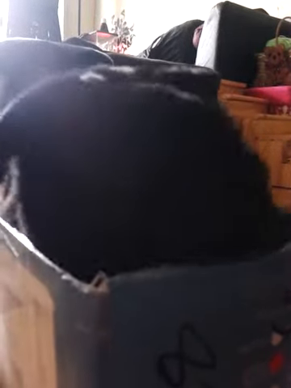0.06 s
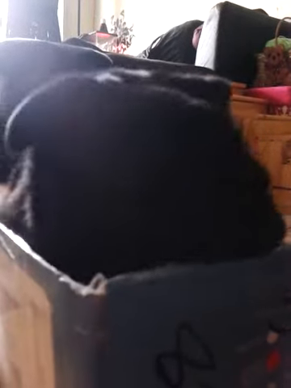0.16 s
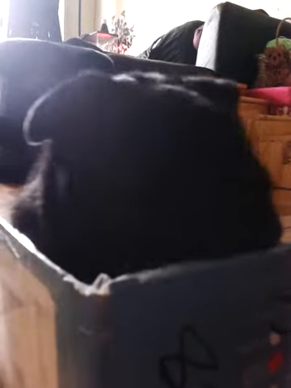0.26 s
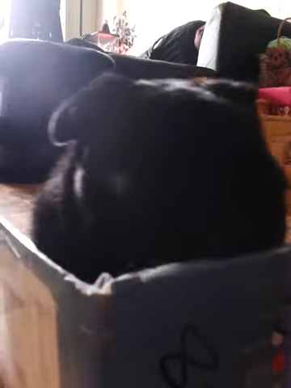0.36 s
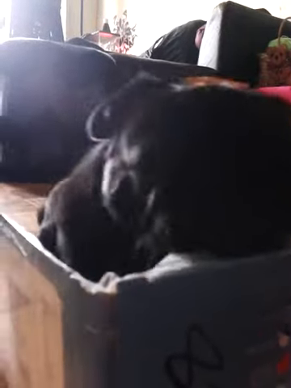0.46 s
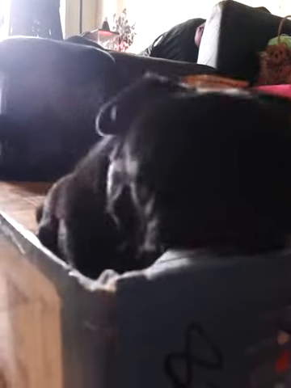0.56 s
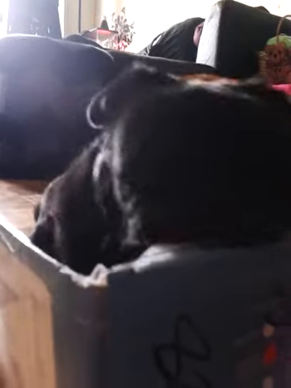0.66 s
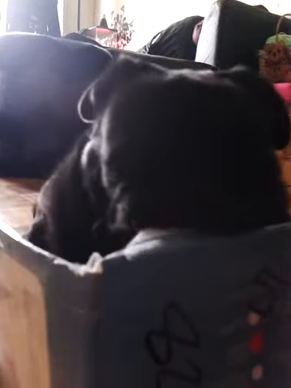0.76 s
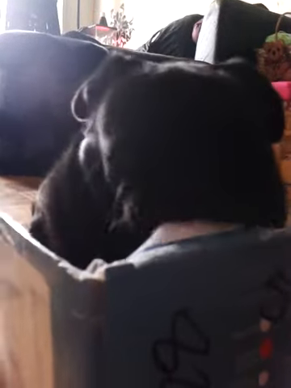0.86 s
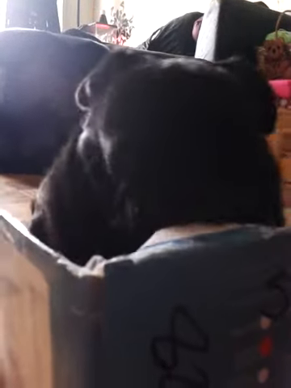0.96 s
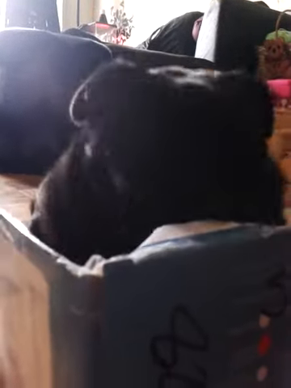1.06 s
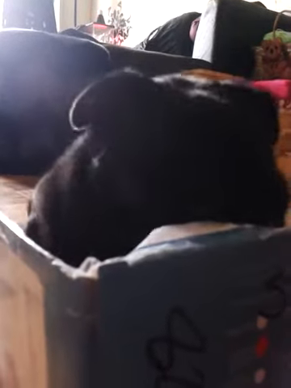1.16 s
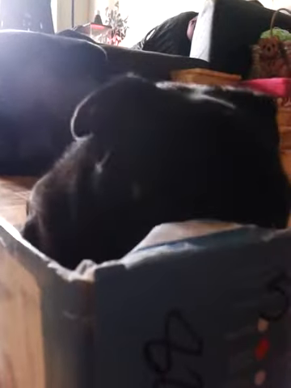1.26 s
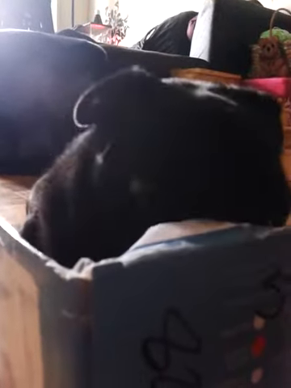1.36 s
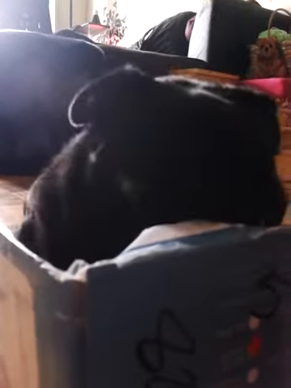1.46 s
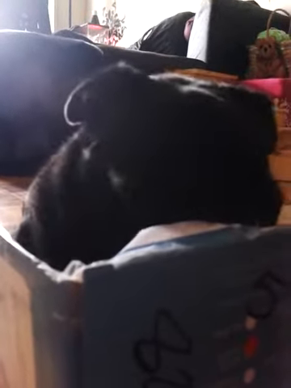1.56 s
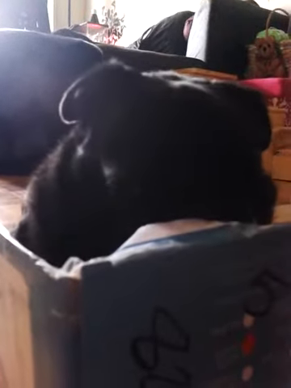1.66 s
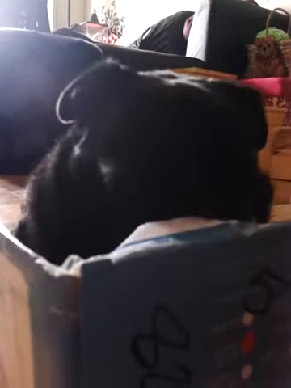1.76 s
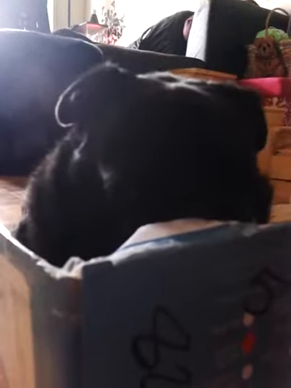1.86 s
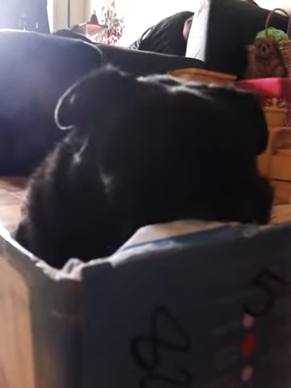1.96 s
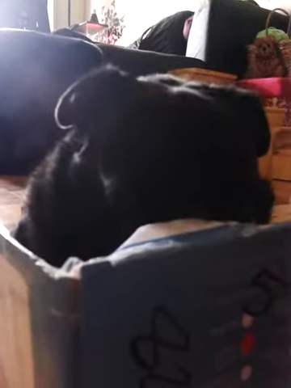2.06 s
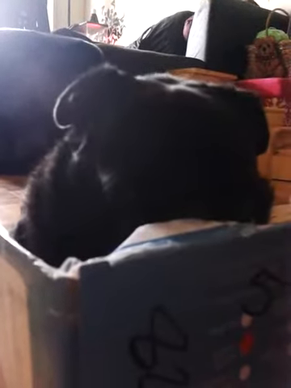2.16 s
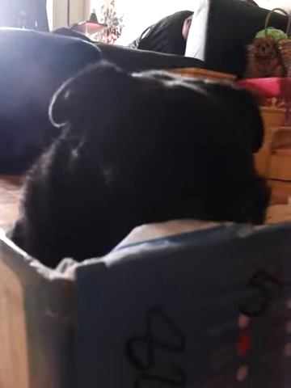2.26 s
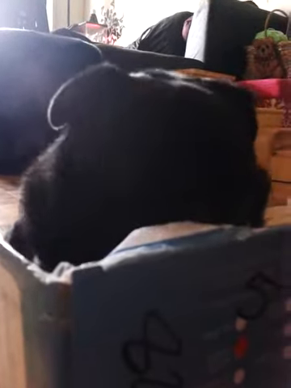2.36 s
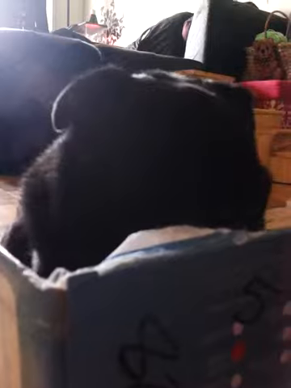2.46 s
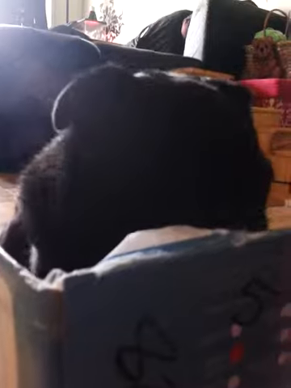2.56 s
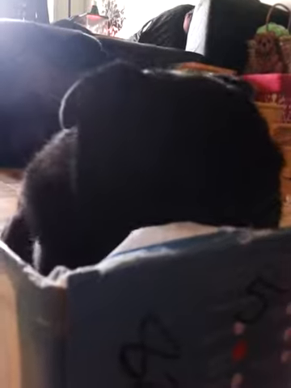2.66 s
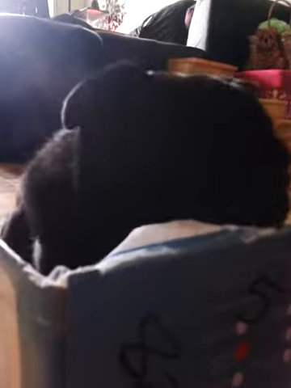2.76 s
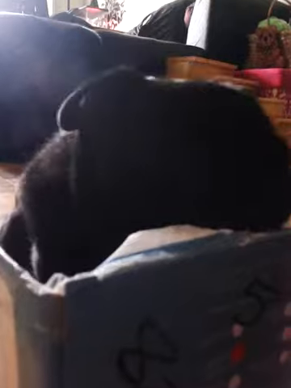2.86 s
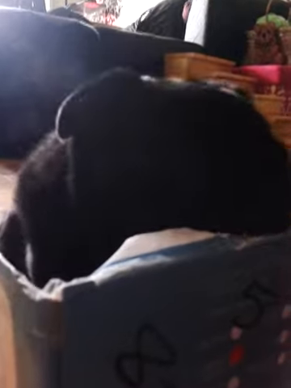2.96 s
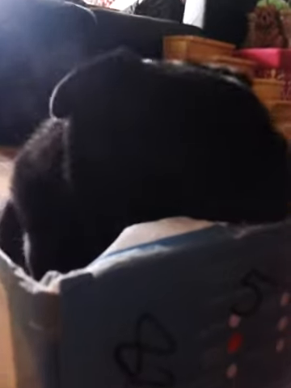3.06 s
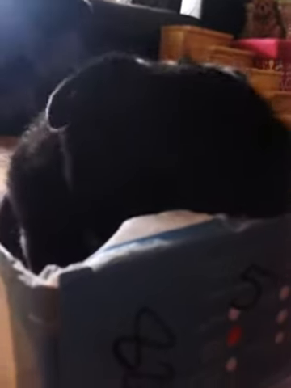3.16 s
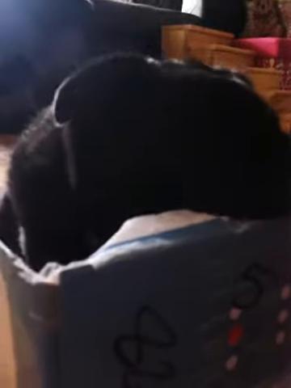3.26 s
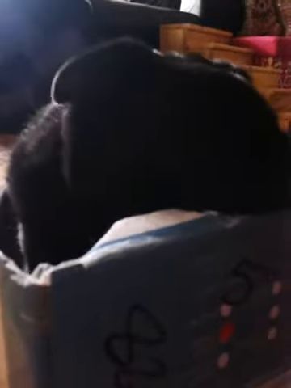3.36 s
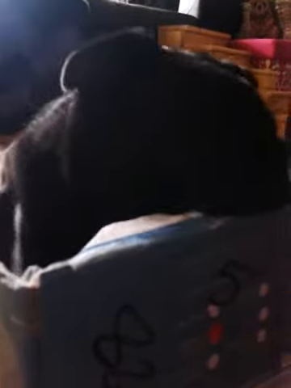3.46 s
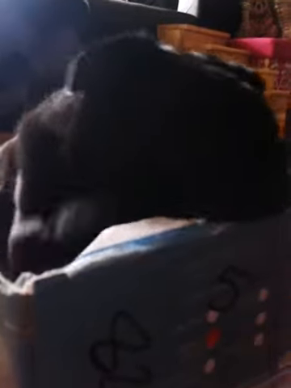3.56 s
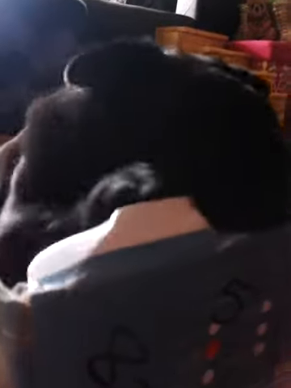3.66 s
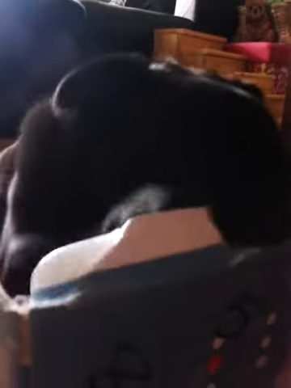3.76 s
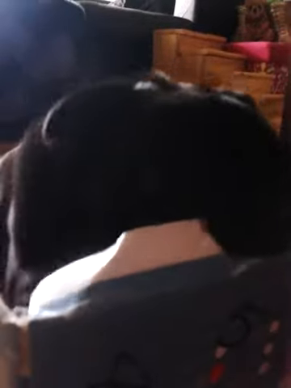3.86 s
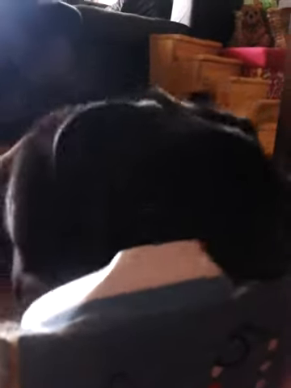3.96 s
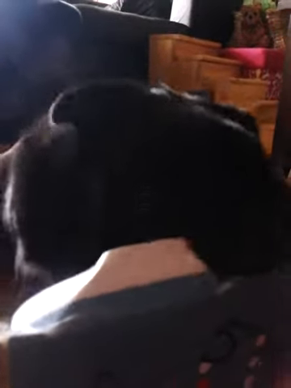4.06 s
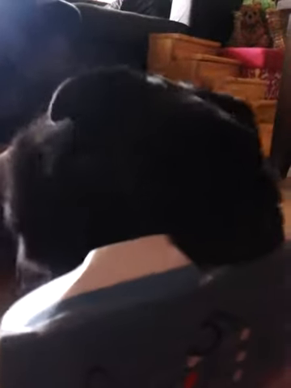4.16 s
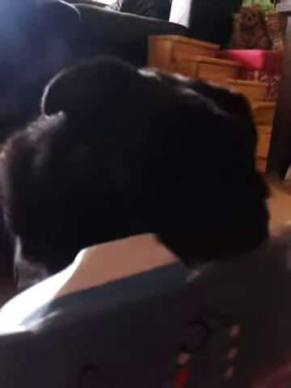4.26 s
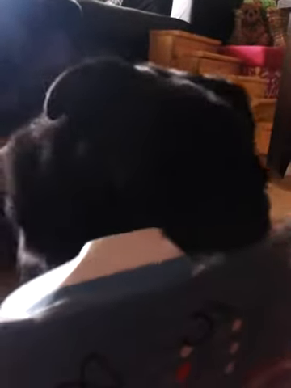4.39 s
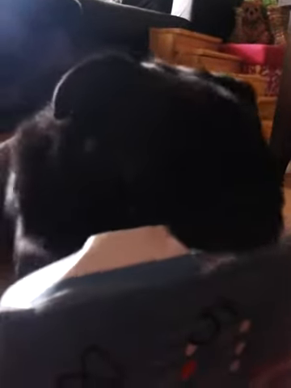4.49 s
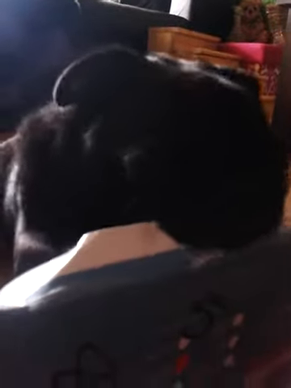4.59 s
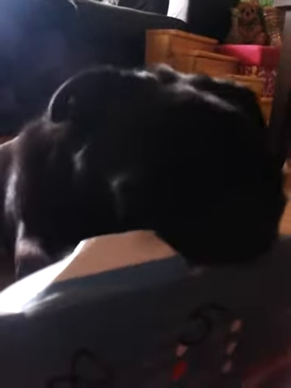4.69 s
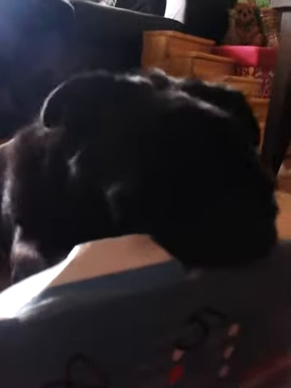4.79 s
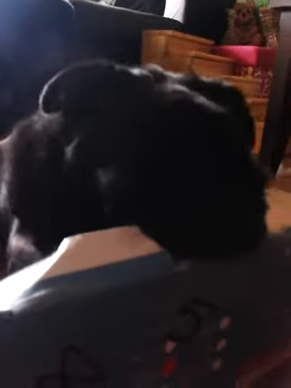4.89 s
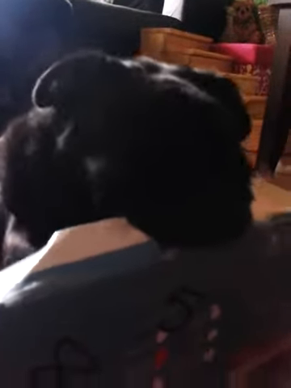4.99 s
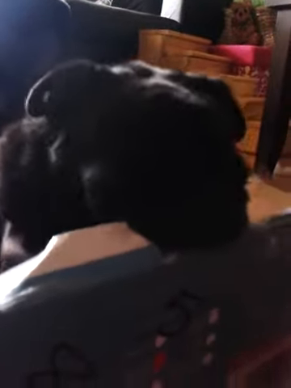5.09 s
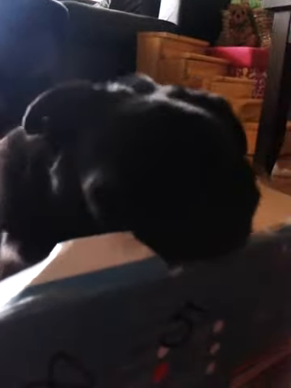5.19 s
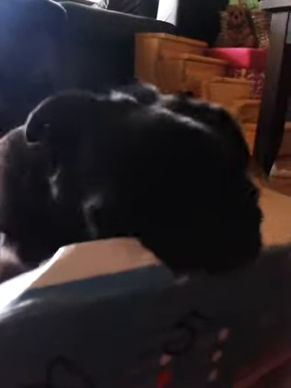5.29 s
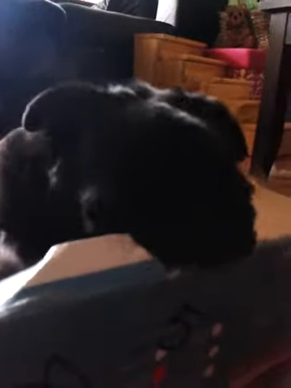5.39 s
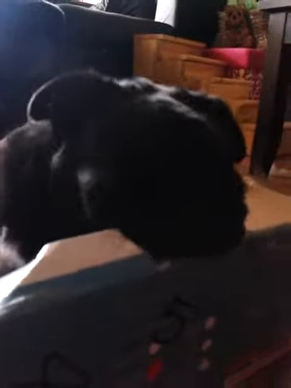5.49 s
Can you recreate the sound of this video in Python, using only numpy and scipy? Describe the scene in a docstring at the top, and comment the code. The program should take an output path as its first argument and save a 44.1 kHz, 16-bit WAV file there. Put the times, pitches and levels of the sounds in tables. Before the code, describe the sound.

Sharp cardboard cracks and crinkles burst out at once, followed by quick nose puffs, faint rubbing and dull box bumps in a quiet room.

```python
"""Over a quiet room hum and hiss, cardboard crinkles, snaps, rips and knocks as a dog works at a box.
The dog then sniffs in quick puffs, rubs its muzzle on the flap and nudges the box about on the floor.
Knocks are sums of fading tones; snaps and ticks are short noise bursts; rips, sniffs and rubbing are
shaped noise. The room answers the hits softly, and the loudest snaps overload the microphone input."""
import sys
import numpy as np
from scipy import signal
from scipy.fft import rfft, irfft, next_fast_len
from scipy.io import wavfile
from scipy.ndimage import map_coordinates

SR = 44100
rng = np.random.default_rng(int(sys.argv[2]) if len(sys.argv) > 2 else 0)


def output_pcm(signal):
    """Save a mono or channel-first signal as 16-bit PCM at the path in sys.argv[1].

    Samples are clipped to [-1, 1] before scaling.
    """
    pcm = np.clip(np.atleast_2d(signal).T, -1, 1) * 32767
    wavfile.write(sys.argv[1], SR, np.round(pcm).astype(np.int16))


N = 243869  # length of the scene in samples


def amp(db):
    """Turn decibels into a plain gain."""
    return 10 ** (np.asarray(db) / 20)


def unit(x):
    """Scale a sound to an average strength (rms) of 1."""
    return x / np.sqrt(np.mean(x ** 2) + 1e-20)


def along(points, hz):
    """Read a curve of (f/Hz, value) points, joined by lines on a log frequency axis."""
    f, v = np.transpose(points)
    return np.interp(np.log(hz + 1), np.log(f + 1), v)


def level(rows):
    """Gain per sample from (t/s, level/dB) rows, practically silent outside them."""
    s, db = np.transpose(rows)
    return amp(np.interp(np.arange(N) / SR, s, db, left=-150, right=-150))


def swells(rows, sharp, lean=1):
    """Gain that rises and falls once per (start t/s, end t/s, level/dB) row; lean under 1 peaks early."""
    t = np.arange(N) / SR
    gain = np.zeros(N)
    for start, end, db in rows:
        progress = np.clip((t - start) / (end - start), 0, 1)
        hump = np.abs(np.sin(np.pi * progress ** lean)) ** sharp
        gain += amp(db) * hump * (t > start) * (t < end)
    return gain


def filtered(x, response):
    """Multiply each frequency of x by response(frequency)."""
    m = next_fast_len(len(x) + 8192)  # spare room so that the end does not wrap round
    return irfft(rfft(x, m) * response(np.fft.rfftfreq(m, 1 / SR)), m)[:len(x)]


def resonant(modes):
    """Response of things that ring after a push: (f/Hz, width/Hz, level/dB) rows, alternating in sign."""
    def response(f):
        total = 0
        for k, (centre, width, db) in enumerate(modes):
            peak = 1j * f * width / (centre * centre - f * f + 1j * f * width)
            total = total + (-1) ** k * amp(db) * peak
        return total
    return response


def grainy(per_s, spread_db):
    """Noise whose strength wanders between per_s random levels a second, rms 1."""
    knots = rng.standard_normal(int(N * per_s / SR) + 4)
    wander = map_coordinates(knots, [np.arange(N) * per_s / SR], order=1)
    return unit(amp(spread_db * wander) * rng.standard_normal(N))


def grainy_like(curve, per_s, spread_db):
    """Grainy noise coloured by a (f/Hz, level/dB per Hz) curve, rms 1."""
    return unit(filtered(grainy(per_s, spread_db), lambda f: amp(along(curve, f))))


# colour of the room air and microphone hiss before scaling: (f/Hz, level/dB per Hz)
AIR_COLOUR = [(15, -56), (25, -25), (175, -7.5), (236, -5.5), (301, -11.5), (624, -20.5), (2000, -39.5),
              (2610, -37.5), (3250, -37), (4370, -38), (6560, -33.5), (14800, -27), (16000, -31)]
AIR_DB = -61.5  # rms
# faint steady drones: (f/Hz, width/Hz, level/dB)
DRONES = [(120.3, 5.4, -68.5), (299, 22, -65.5), (8273, 55, -87)]


def background():
    """Room air and microphone hiss as coloured noise, drones as noise in very narrow bands."""
    air = filtered(rng.standard_normal(N), lambda f: amp(along(AIR_COLOUR, f)))
    out = amp(AIR_DB) * unit(air)
    for hz, width, db in DRONES:
        drone = filtered(rng.standard_normal(N), resonant([(hz, width, 0)]))
        out += amp(db) * unit(drone)
    return out


# strength of the crinkling: (t/s, level/dB)
CRINKLE_LEVEL = [(0, -45.5), (.03, -40), (.2, -47), (.262, -55.5), (.29, -39.5), (.41, -37.5), (.53, -48.5),
                 (.7, -45), (.83, -57), (.9, -47.5), (1.3, -62.5)]
# colour of crinkling card: (f/Hz, level/dB per Hz)
CRINKLE_COLOUR = [(530, -36), (900, -3), (1290, -4), (1460, -3.5), (1600, -7.5), (2540, -3), (3640, -3),
                  (4200, -1.5), (6110, -16.5), (8450, -18), (16000, -39.5)]


def crinkling_flap():
    """The flap crinkles: many tiny card movements blend into uneven noise."""
    return level(CRINKLE_LEVEL) * grainy_like(CRINKLE_COLOUR, per_s=250, spread_db=3.0)


# ways the box walls like to vibrate, before the grip shifts them; also rung by bites: (f/Hz, level/dB)
WALL_MODES = [(130, -43), (230, -4.5), (300, -4.5), (410, 0), (520, 3.5), (610, 0), (780, 0), (930, -0.5),
              (1270, -1), (1560, -0.5), (1850, -2)]
# the box walls flexing: (t/s, level/dB)
FLEXING = [(0.0, -46), (0.49, -48), (0.65, -51), (1.34, -57), (2.71, -57.5), (3.03, -53.5), (3.2, -60),
           (3.62, -60), (3.85, -52.5), (4.17, -61), (4.57, -58.5), (4.93, -68.5), (5.53, -67)]
# strokes of muzzle and paw along the card, rasping too:
# (start t/s, end t/s, rasp level/dB, wall rumble level/dB)
CARD_STROKES = [(0.685, 0.734, -41.5, -48), (0.833, 0.87, -45, -46.5), (0.866, 0.951, -44.5, -41.5),
                (1.035, 1.107, -47, -48), (1.282, 1.376, -58, -52), (1.865, 1.918, -55.5, -69),
                (2.378, 2.45, -56, -77), (2.57, 2.71, -51, -62), (2.775, 2.918, -51.5, -52.5),
                (2.967, 3.113, -55.5, -78), (3.49, 3.603, -65, -62.5), (3.744, 3.839, -59, -43),
                (3.828, 3.908, -65, -50), (3.941, 4.001, -61, -50), (4.052, 4.137, -70, -48),
                (4.227, 4.288, -75.5, -58), (4.458, 4.545, -62, -45.5), (4.508, 4.629, -66.5, -49.5),
                (4.685, 4.778, -78, -68), (5.114, 5.348, -76, -57.5)]


def shaking_walls():
    """Flexing and strokes shake the walls: noise rumbles through their vibration modes."""
    walls = resonant([(hz, 0.15 * hz, db) for hz, db in WALL_MODES])
    rumble = grainy(per_s=150, spread_db=3)
    rumble = unit(filtered(rumble, lambda f: walls(f) / (1 + (f / 800) ** 2.4)))  # dull above 800 Hz
    strokes = [(start, end, rumble_db) for start, end, _, rumble_db in CARD_STROKES]
    return (level(FLEXING) + swells(strokes, sharp=1.7, lean=1.0)) * rumble


# bites and nudges: (t/s, knock of the box level/dB, snap of the card level/dB, tick level/dB,
#                    struck wall f/Hz, snap f/Hz)
HITS = [(0.029, -32, -23.5, -53, 491, 1630), (0.0706, -52, -6.5, -29, 990, 1980),
        (0.0893, -19.5, -17, -38, 880, 2160), (0.1006, -11, 2, -21, 542, 2780),
        (0.1101, -11.5, 2, -35, 884, 3660), (0.275, 3.5, 4.5, -6.5, 857.7, 3120),
        (0.279, -5, 0, -21.5, 590, 1392), (0.3613, -21, -2.5, -28, 853, 2880),
        (0.4035, -16.5, -25, -41, 490, 2150), (0.4518, -35, -27, -45, 548, 2010),
        (0.4705, -41, -38, -31, 610, 2720), (0.4897, -49, -26.5, -41, 530, 4350),
        (0.4983, -35, -49, -30.5, 470, 2190), (0.525, -33, -36, -39, 527, 4080),
        (0.5431, -19.5, -13, -28, 590, 1180), (0.594, -32, -32.5, -43, 1050, 1790),
        (0.6316, -43, -26.5, -44, 1020, 3360), (0.6718, -35, -35, -44, 540, 3620),
        (0.76, -50, -40, -44, 1000, 3090), (0.849, -36, -31.5, -57, 548, 2820),
        (0.8929, -25, -35, -41, 974, 1380), (0.9061, -25, -40, -50, 535, 1300),
        (0.923, -31, -49, -52.5, 527, 1300), (1.5014, -47, -40, -63.5, 410, 4260),
        (1.847, -46, -47.5, -57, 585, 2540), (1.8941, -40.5, -50, -58, 505, 4180),
        (2.0393, -43.5, -39.5, -61.5, 587, 4290), (2.374, -63, -43, -56, 490, 2580),
        (2.3961, -38.5, -25.5, -47, 1060, 2380), (2.454, -48, -40, -46.5, 960, 2420),
        (2.9974, -30.5, -54, -44, 852, 1200), (3.0129, -32.5, -45, -46, 272, 1940),
        (3.0332, -37, -53, -55, 270, 2480), (3.062, -37, -55, -55, 460, 1745),
        (3.0766, -35.5, -49, -53, 318, 1307), (3.1155, -35.5, -60, -49, 295, 1200),
        (3.1487, -36, -58, -52, 290, 1176), (3.1672, -40, -51.5, -54.5, 412, 1220),
        (3.184, -38, -42, -45.5, 393, 4860), (3.204, -39.5, -49.5, -58, 600, 1200),
        (3.29, -42.5, -51.5, -60.5, 863, 1192), (3.3372, -37, -49.5, -53.5, 852, 1200),
        (3.5237, -23.5, -27.5, -46.5, 432, 1380), (3.6663, -36.5, -47, -45, 466, 1415),
        (3.7503, -11.5, -17.5, -18.5, 513, 1800), (3.8368, -20, -31, -76, 520, 1310),
        (3.8768, -36.5, -44, -51, 526, 1320), (3.967, -32, -37.5, -39.5, 462, 1210),
        (4.069, -37, -45.5, -57.5, 413, 1610), (4.161, -44.5, -60, -60, 471, 1360),
        (4.2503, -43.5, -59, -59.5, 448, 1650), (4.345, -38.5, -59, -55.5, 289, 1200),
        (4.42, -43, -47.5, -58, 373, 1183), (4.4689, -29.5, -43, -46.5, 556, 1490),
        (4.558, -35, -57.5, -63, 540, 1500), (4.6904, -42, -58.5, -57.5, 470, 1210),
        (4.711, -46, -51, -56.5, 520, 1745)]
# Softer knocks ring shorter (dB per dB); firm and harder ones all reach LONGEST_S.
# RING_S sets the scale before that limit. Walls above RING_HZ then ring shorter.
RING_S, FIRM_DB, RING_GROWS, LONGEST_S, RING_HZ = 0.07, -26.5, .55, 0.061, 500.3
SNAP_S, TICK_S = 0.011, 0.0066  # time for the burst to fall by 60 dB


def wall_knock(t, hardest_db, wall_hz):
    """A struck wall rings as fading tones; the modes near the struck pitch ring loudest and longest."""
    hz, mode_db = np.transpose(WALL_MODES)
    ring = np.clip(RING_S * amp(RING_GROWS * (hardest_db - FIRM_DB)), .006, LONGEST_S)
    ring *= min(1, RING_HZ / wall_hz) ** 1.904
    nearest = hz[np.argmin(np.abs(hz - wall_hz))]
    bent = hz * wall_hz / nearest  # the grip bends the wall and shifts its modes
    octaves = np.round(np.log2(bent / wall_hz), decimals=6)
    # modes far from the struck part stay weak, most of all the lower ones
    near_db = mode_db - 9 * np.abs(octaves) - 9 * (octaves < 0) - 1.0 * (octaves > 0)
    near_db = near_db + 2 * rng.standard_normal(len(hz))
    life = ring * amp(-5 * np.abs(octaves))
    fade = amp(near_db[:, None] - 60 * t / life[:, None])
    tones = fade * np.sin(2 * np.pi * bent[:, None] * t)
    knock = tones.sum(0) * (1 - np.exp(-t / 0.00045))  # soft start
    return filtered(knock, lambda f: (1j * f / (130 + 1j * f)) ** 2)  # a small wall radiates no deep bass


def card_snap(t, snap_hz):
    """Card snaps as a short noise burst through its own resonance and two weaker, fixed ones."""
    burst = rng.standard_normal(len(t)) * amp(-60 * t / SNAP_S)
    card = resonant([(snap_hz, 420, 1.2), (2300, 900, -5), (4000, 900, -5)])
    snap = filtered(burst, lambda f: card(f) / (1 + 1j * f / (1.6 * snap_hz)) ** 2)
    thick = signal.butter(4, 5200, fs=SR, output="sos")  # thick card gives little treble
    return signal.sosfilt(thick, snap)


def bright_tick(t):
    """A tick is a very short burst of treble noise."""
    burst = rng.standard_normal(len(t)) * amp(-60 * t / TICK_S)
    bright = signal.butter(2, [3800, 13000], "band", fs=SR, output="sos")
    return signal.sosfilt(bright, burst)


def bites():
    """Each bite, nudge or small slip knocks a wall, snaps the card and gives a bright tick."""
    out, t = np.zeros(N + SR), np.arange(SR // 5) / SR
    for s, knock_db, snap_db, tick_db, wall_hz, snap_hz in HITS + slips():
        parts = [(knock_db, wall_knock(t, max(knock_db, snap_db), wall_hz)),
                 (snap_db, card_snap(t, snap_hz)),
                 (tick_db, bright_tick(t))]
        for db, sound in parts:
            out[round(s * SR):][:len(t)] += amp(db) * sound / np.abs(sound).max()
    return out[:N]


# time for the room's answer to fall by 60 dB: (f/Hz, t/s)
ROOM_DECAY = [(200, 0.38), (1000, 0.12), (4000, 0.12), (8000, 0.11)]


def room(x):
    """The room answers with a noise tail in which each frequency dies at its own speed."""
    hz, t, z = signal.stft(rng.standard_normal(SR // 2), SR, nperseg=256)
    fading = z * amp(-60 * t / along(ROOM_DECAY, hz)[:, None])
    tail = signal.istft(fading, SR, nperseg=256)[1]
    late = np.pad(x, (250, 0))  # the answer starts 250 samples after the hit
    return signal.fftconvolve(late, tail / np.linalg.norm(tail))[:N]


# fibres tearing: (start t/s, end t/s, level/dB)
TEARS = [(0.085, 0.133, -24), (0.115, .235, -40), (0.288, 0.36, -34.5), (0.358, 0.409, -19)]
# colour of ripping fibres: (f/Hz, level/dB per Hz)
FIBRE_COLOUR = [(410, -54.5), (700, -22.5), (863, -11), (1050, -18), (1210, -5), (1870, -11.5), (2190, 0),
                (2920, -9.5), (3160, -8.5), (4320, -6), (6230, -27.5), (12500, -33), (16000, -46.5)]


def ripping():
    """Fibres part in dense clumps, heard as grainy noise that swells with each rip."""
    return swells(TEARS, sharp=0.69, lean=0.47) * grainy_like(FIBRE_COLOUR, per_s=400, spread_db=4.0)


SLIP_GAP_S, SLIP_DB = 0.0095, (-5.5, 8.5, -8)  # typical gap; knock, snap and tick over the rip's level
SLIP_WALL_HZ, SLIP_SNAP_HZ = 597.3, 2799  # the snap pitch varies around its value


def slips():
    """A rip also gives a run of up to 12 small snaps at uneven gaps, as rows like the bites."""
    rows = []
    for start, end, db in TEARS:
        gap, size, bend = rng.standard_normal((3, 12))
        times = start + .012 + np.cumsum(SLIP_GAP_S * amp(2.4 * gap))
        for s, more_db, pitch in zip(times, 3.1 * size, amp(1.8 * bend)):
            if s < end:
                levels = db + more_db + np.array(SLIP_DB)
                rows.append((s, *levels, SLIP_WALL_HZ, SLIP_SNAP_HZ * pitch))
    return rows


# the box drops on the floor: (t/s, level/dB, f/Hz)
FLOOR_DROPS = [(0.103, -18.5, 232), (0.278, -47, 198), (.402, -29, 174), (0.896, -23.5, 189),
               (4.552, -56.5, 250.3)]


def floor_thumps():
    """The box drops on the floor: a low tone with a soft start that fades fast."""
    out, t = np.zeros(N + SR), np.arange(SR // 5) / SR
    for s, db, hz in FLOOR_DROPS:
        fade = amp(db - 60 * t / 0.082) * (1 - np.exp(-t / 0.0069))
        out[round(s * SR):][:len(t)] += fade * np.sin(2 * np.pi * hz * t)
    return out[:N]


# puffs of air through the nose: (start t/s, end t/s, level/dB)
PUFFS = [(.53, .62, -45.5), (.67, .73, -47), (.76, 1.02, -49), (1.03, 1.24, -50.5), (1.24, 1.34, -46.5),
         (1.33, 1.42, -49.5), (1.51, 1.552, -46), (1.56, 1.61, -59), (1.635, 1.71, -48.5),
         (1.715, 1.76, -54), (1.85, 1.935, -51), (1.96, 2.01, -62), (2.045, 2.125, -47.5),
         (2.225, 2.33, -51.5), (2.41, 2.56, -60.5)]
# nose resonances, before the response is raised to a power: (f/Hz, width/Hz, level/dB)
NOSE_MODES = [(2501, 460, -1.5), (3066, 300, -1), (4246, 450, 2.5), (7280, 240, -30.5)]


def sniffing():
    """Air rushing through the nose hisses at the nose's resonances."""
    nose = resonant(NOSE_MODES)
    hiss = unit(filtered(grainy(per_s=60, spread_db=2.5), lambda f: np.abs(nose(f)) ** 2.1))
    return swells(PUFFS, sharp=0.47) * hiss


# thin high swishes: (start t/s, end t/s, level/dB near 9 kHz, level/dB near 11.6 kHz)
SWISHES = [(0.535, 0.613, -62, -60.5), (.6, 0.764, -58, -65), (0.884, 0.975, -67, -71),
           (1.042, 1.192, -68.5, -73.5), (2.577, 2.696, -80, -86), (2.81, 2.973, -67, -62.5),
           (2.956, 3.144, -67.5, -57), (3.297, 3.445, -76.5, -72)]


def high_swishes():
    """Thin swishes are narrow bands of treble noise that swell and fade."""
    def band(hz, width):
        return unit(filtered(rng.standard_normal(N), lambda f: 1 / (1 + ((f - hz) / width) ** 2)))

    lower = swells([(a, b, db) for a, b, db, _ in SWISHES], sharp=0.53) * band(9220, 880)
    upper_band = band(11600, 600) + amp(-6) * band(15100, 900)
    upper = swells([(a, b, db) for a, b, _, db in SWISHES], sharp=0.99) * upper_band
    return lower + upper


# fur resting and sliding on the flap: (t/s, level/dB)
FUR_LEVEL = [(1.1, -53), (1.25, -64), (1.44, -62), (2.16, -63), (2.46, -56.5), (2.99, -60), (3.27, -71.5),
             (3.91, -67.5), (4.23, -73), (5.53, -77)]
# colour of fur on card: (f/Hz, level/dB per Hz)
FUR_COLOUR = [(530, -34), (900, -2.5), (1020, -1), (1550, -12), (1900, -4), (2930, -5), (4300, -6.5),
              (5300, -15.5), (7200, -22), (16000, -29.5)]


def rubbing():
    """Fur, muzzle and paw rasp along the card: fine-grained noise, stronger in each stroke."""
    strokes = [(start, end, rasp_db) for start, end, rasp_db, _ in CARD_STROKES]
    rasping = level(FUR_LEVEL) + swells(strokes, sharp=0.94)
    return rasping * grainy_like(FUR_COLOUR, per_s=480, spread_db=2.0)


def scene():
    """Add all the layers; the room answers only the bites and thumps."""
    hits = bites() + floor_thumps()
    cardboard = crinkling_flap() + shaking_walls() + ripping() + rubbing()
    dog = sniffing() + high_swishes()
    return (background() + cardboard + hits + amp(-16.0) * room(hits) + dog)[None]


TOP_HZ = 15800  # nothing passes above this


def record(dry):
    """The input clips smoothly near full scale, deep bass is thinned and the top of the treble is cut."""
    top = .72  # the clipping limit, 1 being full scale, before the bass is thinned
    clipped = dry[0] / (1 + np.abs(dry[0] / top) ** 6) ** (1 / 6)
    thin = filtered(clipped, lambda f: 1 - amp(-1.0) + amp(-2.0) * (1j * f / (70 + 1j * f)) ** 2)
    return filtered(thin, lambda hz: hz < TOP_HZ)[None]


dry = scene()
out = record(dry)
output_pcm(out)
```